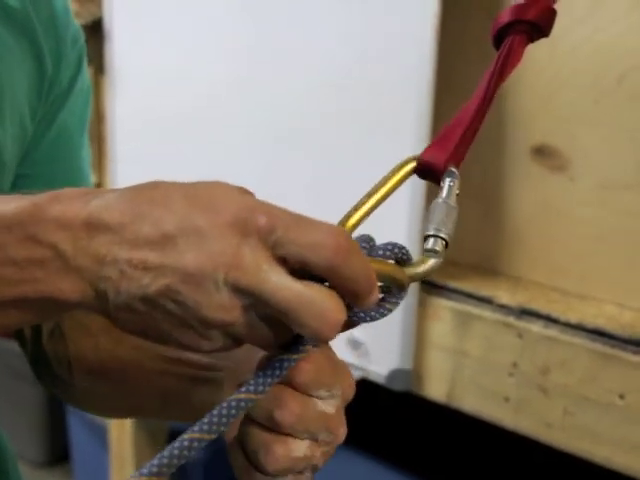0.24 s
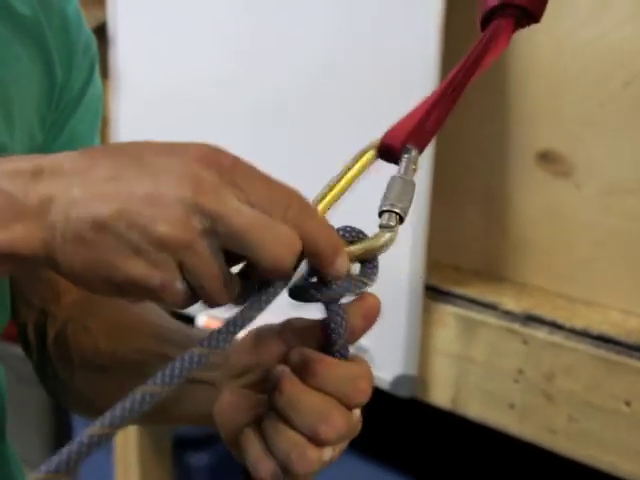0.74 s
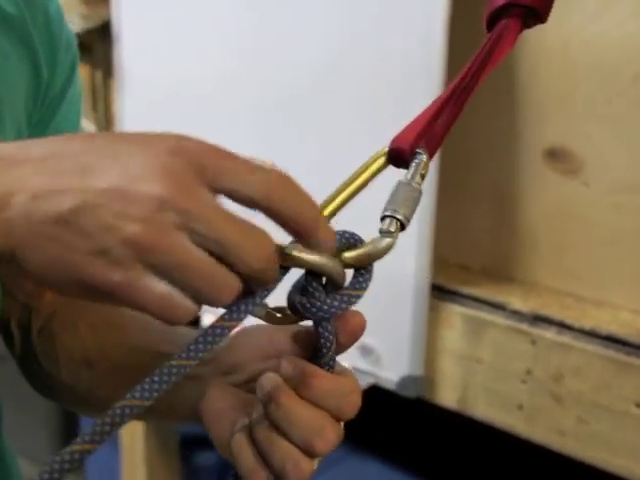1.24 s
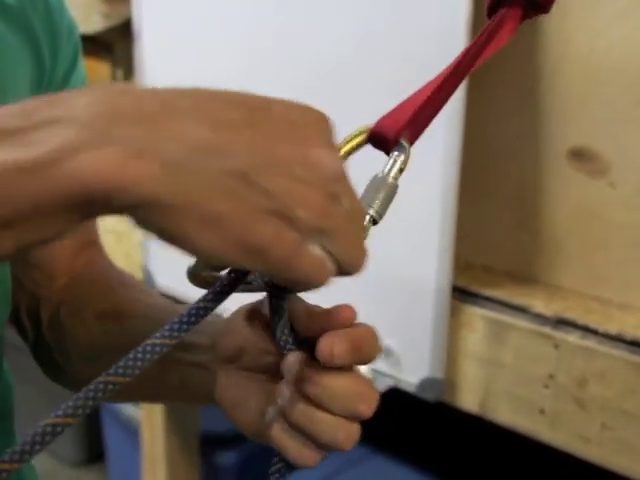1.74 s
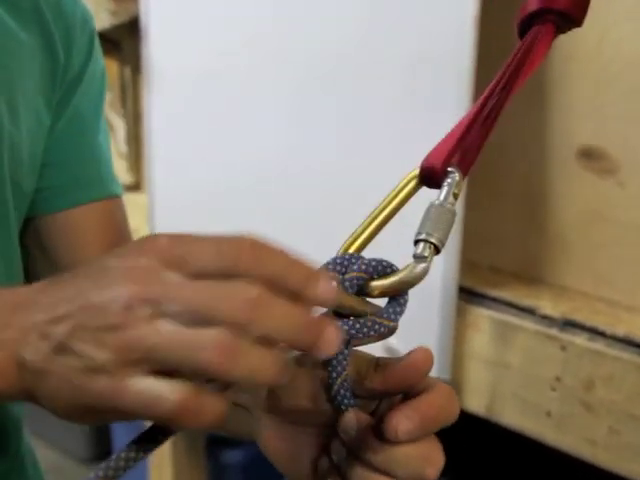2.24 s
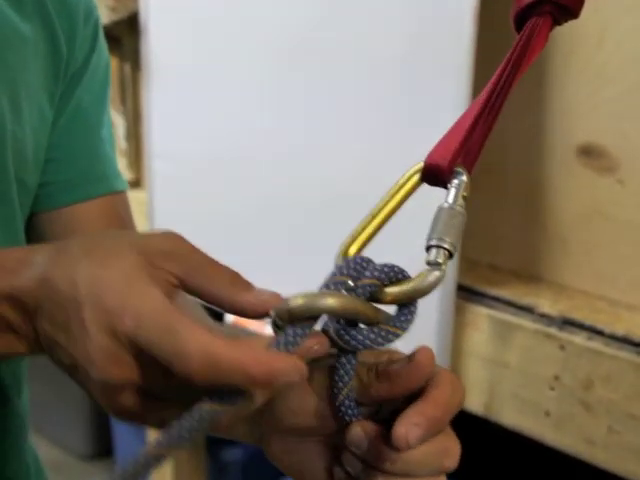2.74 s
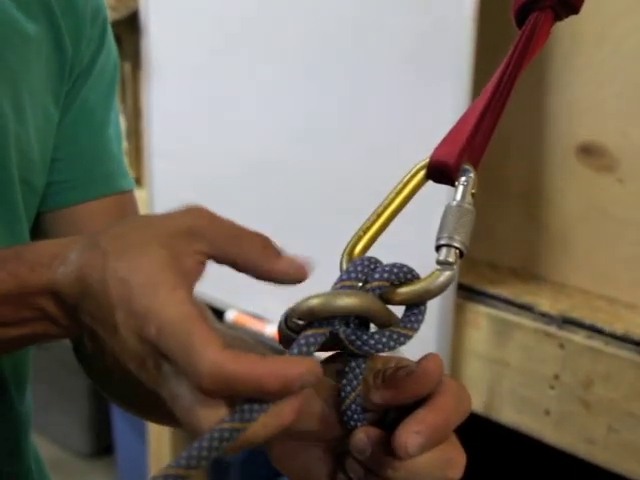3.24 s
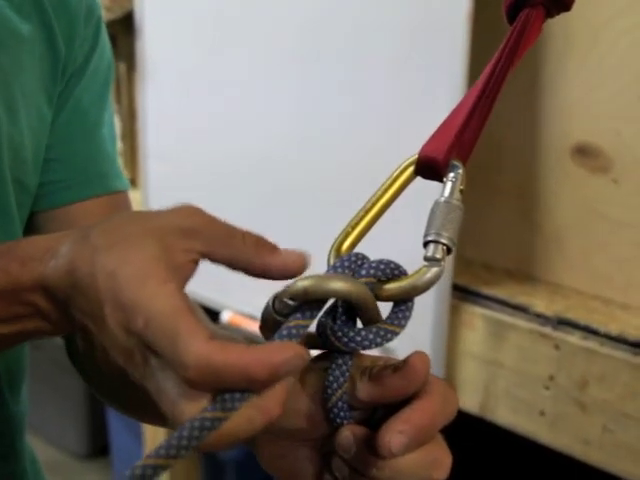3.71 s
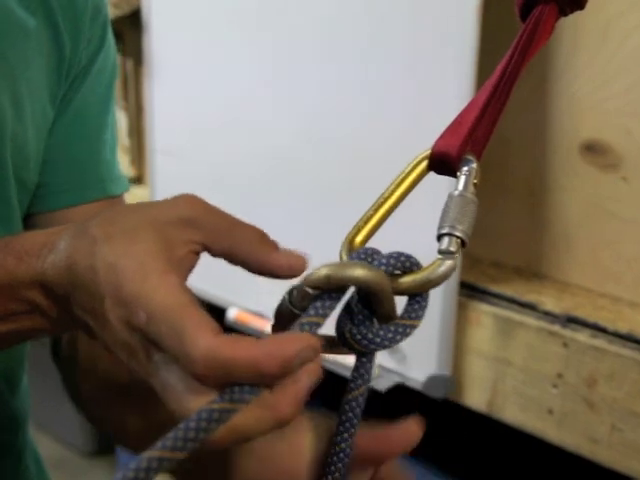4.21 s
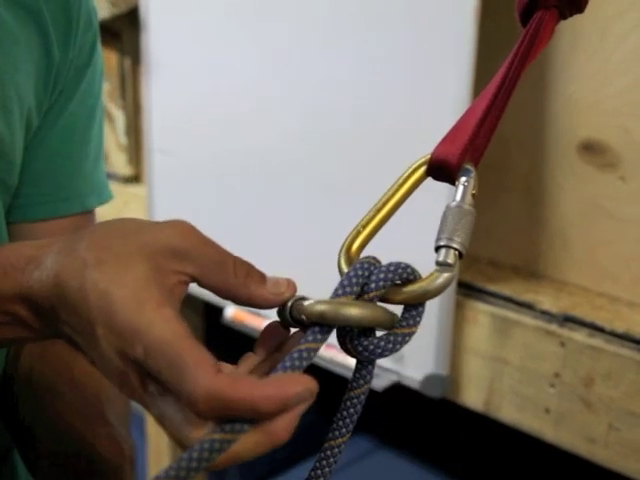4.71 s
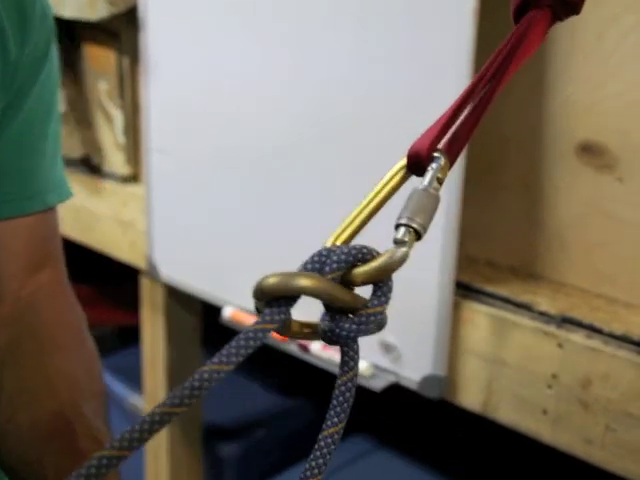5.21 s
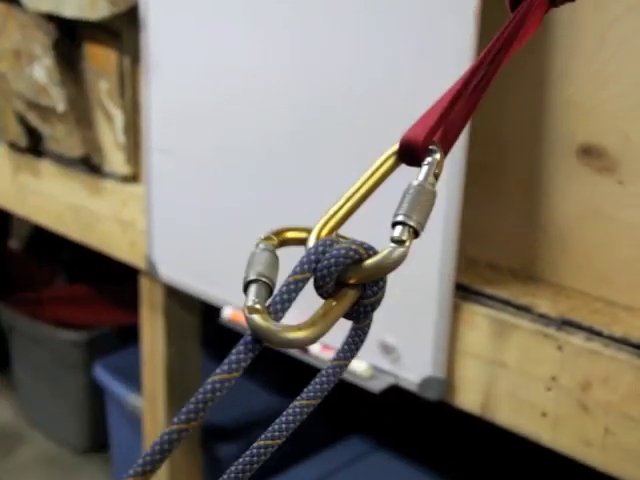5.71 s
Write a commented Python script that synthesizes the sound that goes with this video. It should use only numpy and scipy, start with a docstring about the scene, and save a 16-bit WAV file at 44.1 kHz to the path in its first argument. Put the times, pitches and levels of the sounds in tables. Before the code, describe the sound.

A close microphone in a small timber workshop picks up carabiners being worked on a rope, over a soft low wash of outside traffic with gliding engine drones and a very faint high whine that comes and goes. From 0.2 to 0.9 s there are light scrapes, small clinks and growing dull knocks. At 1.0 s a very loud, bright steel snap cracks out, briefly ducking the background. A clink follows at 1.3, a knock at 1.5, a rope rasp with a tiny squeak at 1.7, a firmer knock at 1.9 and a softer one at 2.2. Soft low bumps come around 2.4-2.6. From 2.75 to 4.1 s a loose screw sleeve ticks and scrapes in short turns, ending in a ringing clink. Dull taps and rope rubbing start at 4.9; at 5.6 s a second loud snap rings high, then rope rasps as traffic swells.

```python
"""A small workshop, where hands work a rope into two steel carabiners hung from a sling.
Struck steel rings in modes (knocks, clinks, sleeve ticks); stick-slip friction makes scrapes, squeaks and rope rasp.
Outside, traffic is shaped noise with gliding drones; a thin whine is a tone whose pitch and level arch.
The room adds reflections and a tail, and the loudest snaps make the recorder's limiter duck."""
import sys
import numpy as np
from scipy import signal
from scipy.fft import rfft, irfft
from scipy.io import wavfile
from scipy.ndimage import uniform_filter1d, minimum_filter1d

SR = 44100
rng = np.random.default_rng(int(sys.argv[2]) if len(sys.argv) > 2 else 0)


def unload_wav(signal):
    """Save mono or channel-first audio to the path in sys.argv[1] as 16-bit WAV at rate SR, clipped to [-1, 1]."""
    wavfile.write(
        sys.argv[1],
        SR,
        np.round(np.clip(np.atleast_2d(signal).T, -1, 1) * 32767).astype(np.int16),
    )


N = 262836
TIME = np.arange(N) / SR
EDGE_HZ = 16300  # upper band limit

# radiation colour of the loose screw sleeve, with narrow high resonances: f/Hz, level/dB
SLEEVE_COLOUR = [(200, -40), (1100, -19.5), (2200, -3), (2700, -3.5), (3300, 1), (4500, -2.5), (5600, -4),
                 (6700, -3), (7450, 4.5), (8600, -7), (9500, -3.5), (10200, -11.5), (10750, -7.5),
                 (11500, -16.5), (16000, -27.5)]
# turns of the sleeve, a tick as the thumb grips, then a scrape:
# t/s, length/s, tick level/dB, tick tilt/(dB/octave), scrape level/dB before the trim of all scrapes
TURNS = [(2.7583, 0.15, -31.5, 2, -40), (3.124, 0.05, -34.5, -2, -38.5), (3.4005, 0.044, -24, -1, -40),
         (3.628, 0.044, -38.5, -4, -34.5), (3.8541, 0.076, -25, 9.5, -34.5), (4.0885, .04, -31, -0.5, -35)]


def amp(db):
    """Level law: decibels to amplitude ratio."""
    return 10 ** (np.asarray(db) / 20)


def unit(x):
    """Energy normalisation: scales to rms 1."""
    return x / np.sqrt(np.mean(x ** 2) + 1e-20)


def read(points, hz):
    """Interpolates a spectrum on a logarithmic frequency axis."""
    f, value = np.transpose(points)
    return np.interp(np.log(hz + 1), np.log(f + 1), value)


def curve(rows):
    """Piecewise-linear envelope in time."""
    return np.interp(TIME, *np.transpose(rows))


def add(mix, s, sound):
    """Superposition: adds a sound into the mix at time s."""
    part = mix[max(round(s * SR), 0):][:len(sound)]
    part += sound[:len(part)]


def wander(rate_hz, size=N):
    """Random modulation: noise under a Gaussian low-pass, rms 1 over the full length."""
    hz = np.fft.rfftfreq(N, 1 / SR)
    spectrum = rfft(rng.standard_normal(N)) * np.exp(-(hz / rate_hz) ** 2)
    return unit(irfft(spectrum, N))[:size]


def colour(x, points, tilt=0, size=4096):
    """Minimum-phase filter: a causal response with the given spectrum, tilted in dB per octave about 4 kHz."""
    hz = abs(np.fft.fftfreq(size, 1 / SR))
    tilt_db = tilt * np.log2(np.clip(hz, 300, 13000) / 4000)
    log_gain = np.log(amp(read(points, hz) + tilt_db))
    # the Hilbert transform of the log gain gives the phase
    taps = np.fft.ifft(np.exp(np.conj(signal.hilbert(log_gain)))).real
    return signal.fftconvolve(x, taps[:size // 2])[:len(x)]


def resonate(x, hz, width_hz):
    """Resonance: two cascaded peaks act as a band of close modes around hz; rms 1."""
    b, a = signal.iirpeak(hz, hz / width_hz, fs=SR)
    once = signal.lfilter(b, a, x)
    return unit(signal.lfilter(b, a, once))


def steel(t):
    """Free vibration: a sum of damped modes of the steel bodies, weighted a little differently at each blow."""
    # modes of the steel bodies: f/Hz, level/dB (before the chance weighting), t60/s
    steel_modes = [(671, -10.5, 0.17), (1190, -7.5, 0.069), (1470, -7.5, 0.2), (1713, 7, 0.062),
                   (2210, 0, 0.052), (2984, -2.5, 0.18), (3400, -10.5, 0.051), (4140, -11, .1),
                   (4570, -14.5, 0.14), (4960, 0.5, .12), (6600, -14, 0.084), (6820, 9.5, 0.041),
                   (6660, -17.5, 0.067), (7300, -6, 0.21), (7740, 2.5, 0.086), (9260, -17, 0.081),
                   (10100, 4, 0.13)]
    ring = np.zeros(len(t))
    for hz, db, t60 in steel_modes:
        decay = amp(db + 2 * rng.standard_normal() - 60 * t / t60)
        ring += decay * np.sin(2 * np.pi * (hz * t + rng.random()))
    return ring


def blow(row, body, contact, modes_db, width_hz, soft_hz=10800, db_per_octave=26):
    """Impact excitation: a hard contact and dying chatter drive the body; the struck spot favours one band."""
    s, db, tilt, chatter, hz, favoured_db = row
    t = np.arange(SR // 3) / SR
    envelope = np.exp(-t / max(chatter, 1e-4)) + contact * np.exp(-t / 0.00073)
    force = rng.standard_normal(len(t)) * envelope
    sound = unit(colour(unit(force) + amp(modes_db) * unit(steel(t)), body, tilt))
    sound = sound + amp(favoured_db) * resonate(force, hz, width_hz)
    # a harder blow makes a shorter contact, which reaches higher
    top_hz = min(soft_hz * 2 ** (max(db + 29.5, 0) / db_per_octave), .45 * SR)
    sound = signal.lfilter(*signal.butter(4, top_hz, fs=SR), sound)
    return amp(db) * sound / sound[:SR // 100].std()  # level of the first 10 ms


def blows(rows, body, contact, modes_db, width_hz):
    """Superposition of all impacts of one kind."""
    out = np.zeros(N)
    for row in rows:
        add(out, row[0], blow(row, body, contact, modes_db, width_hz))
    return out


def slips(size, per_s, spread_db):
    """Stick-slip friction: a random train of tiny slips of uneven strength and either sign."""
    strength = amp(spread_db * np.minimum(rng.exponential(1, size), 4))
    return strength * rng.choice([-1, 1], size) * (rng.random(size) < per_s / SR)


def swells(rows, waver):
    """Frequency modulation: short unsteady tones under a raised-cosine envelope."""
    out = np.zeros(N)
    for s, length, hz, db in rows:
        size = int(max(length, .005) * SR)
        turns = np.cumsum(hz * (1 + waver * wander(460, size))) / SR
        add(out, s, amp(db) * unit(np.sin(2 * np.pi * turns) * np.hanning(size)))
    return out


def traffic():
    """Broadband and tonal sources: a low wash of shaped noise, with wavering, gliding engine drones."""
    # mean level of the wash: t/s, level/dB
    wash_level = [(0, -45), (.8, -41.5), (1.3, -44), (2.2, -44), (2.7, -46.5), (5.1, -43), (5.96, -36)]
    # colour of the wash: f/Hz, level/dB
    wash_colour = [(25, -33.5), (38, -16), (54, -1), (95, 2), (170, 0.5), (240, -2), (310, -9),
                   (520, -13.5), (950, -9.5), (1600, -10.5), (2200, -19.5), (4000, -25.5), (7200, -32),
                   (10500, -35.5), (16000, -40.5)]
    # evenly gliding drones: first f/Hz, last f/Hz, first level/dB, last level/dB (means, as both waver)
    drones = [(68.3, 40, -48, -61.5), (118.5, 104, -48, -53), (221.7, 218, -50, -51.5),
              (269.5, 308, -93.5, -43.5), (123.6, 170, -73, -45.5)]
    gain = amp(read(wash_colour, np.fft.rfftfreq(N, 1 / SR)))
    wash = irfft(rfft(rng.standard_normal(N)) * gain, N)
    out = amp(curve(wash_level) + .5 * wander(13)) * unit(wash)
    for hz0, hz1, db0, db1 in drones:
        turns = np.cumsum(np.linspace(hz0, hz1, N) + 0.72 * wander(3.5)) / SR
        level_db = np.linspace(db0, db1, N) + 2 * wander(2.5)
        out += amp(level_db) * np.sin(2 * np.pi * turns)
    return out


def whine(fuzz_hz=170):
    """Frequency modulation: a faint tone, fuzzed by random modulation, whose pitch and level arch together."""
    # arches of the whine: top t/s, rise/s, fall/s, top f/Hz, peak level/dB
    arches = [(.05, .16, 0.24, 6440, -56), (.34, .12, .06, 7600, -57), (2.229, 0.13, .26, 9400, -57),
              (2.58, 0.18, 0.14, 10070, -56.5), (4.81, 0.18, 0.16, 7500, -60.5)]
    sag, top_width = .17, 0.42  # share of pitch lost at the feet; width of the top as a share of rise or fall
    out = np.zeros(N)
    for s, rise, fall, top_hz, db in arches:
        from_top = np.clip((TIME - s) / np.where(TIME < s, rise, fall), -1, 1)
        hz = top_hz * (1 - sag * (1 - np.exp(-(from_top / top_width) ** 2)))
        turns = np.cumsum(hz + fuzz_hz * wander(895)) / SR
        out += amp(db) * (1 - from_top ** 2) * np.sin(2 * np.pi * turns)
    return out


def rope(uneven_db=1.0):
    """Friction noise: dense slips of the woven sheath on steel, in pulls that build, hold and die away."""
    # colour of the rasp: f/Hz, level/dB
    rasp_colour = [(400, -2.5), (1500, 4), (3000, 2.5), (5000, 3.5), (7200, 7.5), (9000, -2), (12000, -16),
                   (16000, -36.5)]
    # pulls through the hitch: t/s, length/s, level/dB (joined by power to the light rubbing)
    pulls = [(.77, 0.036, -44), (1.697, 0.087, -44.5), (2.464, .33, -59.5), (5.001, .13, -43.5),
             (5.23, 0.19, -49.5), (5.589, 0.11, -40), (5.867, .11, -37.5)]
    attack_s, release_s = 0.051, 0.049
    rasp = colour(slips(N, per_s=7600, spread_db=4), rasp_colour)
    level = amp(-61)  # between pulls the hands keep the rope rubbing lightly
    for s, length, db in pulls:
        before = np.maximum(s - TIME, 0) / attack_s
        after = np.maximum(TIME - s - length, 0) / release_s
        level = np.hypot(level, amp(db) * np.exp(-(before + after)))
    return level * amp(uneven_db * wander(40)) * unit(rasp)


def scrapes(favoured_db=-6, width_hz=900):
    """Stick-slip excitation: steel drags over steel in tiny slips; a duller scrape favours lower modes."""
    # carabiners scrape on each other: t/s, length/s, level/dB before the trim below, tilt/(dB/octave)
    drags = [(0.183, 0.047, -48, 0), (0.536, 0.037, -39.5, -2), (0.601, 0.047, -44.5, -0.5),
             (0.766, 0.044, -36.5, -11.5), (0.835, 0.052, -38.5, -14.5), (1.594, 0.026, -41, -6.5),
             (1.655, .026, -43, -1.5), (2.049, 0.081, -45, -3), (5.55, 0.033, -40.5, -7.5)]
    grip_s, turn_tilt = .013, -1.5  # delay of the scrape after the grip, its tilt in dB per octave
    neutral_hz, db_per_octave = 5530, 6  # favoured pitch at no tilt; so much less tilt lowers it an octave
    out = np.zeros(N)
    turning = [(s + grip_s, length, db, turn_tilt) for s, length, _, _, db in TURNS]
    for s, length, db, tilt in drags + turning:
        hz = min(neutral_hz * 2 ** (tilt / db_per_octave), EDGE_HZ)
        size = int(max(length, .005) * SR)
        force = slips(size, per_s=1000, spread_db=5) * signal.windows.tukey(size, .4)
        force = np.pad(force, (0, 256))  # room for the ringing to die
        grains = unit(colour(force, SLEEVE_COLOUR, tilt))
        grains = grains + amp(favoured_db) * resonate(force, hz, width_hz)
        add(out, s, amp(db) * unit(grains))
    return amp(-3.0) * out  # trim of all scrapes


def clinks():
    """Impact of metal: bright clinks and snaps, the bright onsets of some knocks, and a few duller thumps."""
    # blows: t/s, level/dB, tilt/(dB/octave), chatter decay/s, favoured f/Hz, its level/dB
    clink_rows = [(.2135, -43.5, -7, .002, 3420, -15), (.4172, -28, -0.5, 0.00069, 7020, -4),
                  (.558, -35.5, -6, 0.00066, 5600, -7), (.678, -25.5, -4.5, 0.0013, 6700, 2),
                  (.9286, -18.5, -3.5, 0.00043, 6770, 16), (1.0048, -4, 2.5, 0.0053, 5150, -4.5),
                  (1.009, 1.5, 2.5, 0.0013, 6170, -11), (1.0118, -10, 0, .001, 3620, -1.5),
                  (1.2766, -16.5, 0.5, 0.001, 6980, 1.5), (1.4442, -30.5, -3, .012, 7270, -1),
                  (2.2292, -31, -6.5, .0023, 6700, -5), (4.132, -19, 3.5, 0.0068, 7200, -13),
                  (4.1338, -20.5, 11.5, 0.0016, 4690, 0.5), (4.918, -32, -10, 0.0025, 1770, 14),
                  (4.9228, -35, -7.5, 0.0016, 3360, 5), (4.9352, -33.5, -5.5, 0.001, 4570, -8),
                  (5.5928, -3.5, 2.5, 0.002, 5790, -7.5), (5.833, -35.5, -10, 0.0056, 1980, 4)]
    # colour before the tilt: f/Hz, level/dB
    clink_colour = [(100, -44.5), (400, -12), (1000, -27.5), (2100, -0.5), (2700, -5), (3400, 0.5),
                    (5000, 0.5), (6300, 2), (7400, 3.5), (9000, -4), (10700, -9.5), (11800, -13),
                    (16000, -23.5)]
    return blows(clink_rows, clink_colour, contact=0.23, modes_db=-20.5, width_hz=660)


def knocks():
    """Impact under load: dull knocks of the loaded carabiners."""
    # knocks: t/s, level/dB, tilt/(dB/octave), chatter decay/s, favoured f/Hz, its level/dB
    knock_rows = [(.3218, -36, -5, 0.0064, 1610, -11), (.379, -30, 0.5, 0.0092, 4770, -22),
                  (.678, -19.5, -1, .014, 1160, -18), (.9288, -17, 0, 0.0045, 3270, -14),
                  (.9355, -23.5, -1, .007, 4550, -3.5), (1.5245, -24.5, 0.5, 0.0077, 2174, -3.5),
                  (1.8215, -30.5, -1, 0.011, 3450, -7), (1.8668, -17.5, -0.5, 0.0043, 5160, -6),
                  (2.2292, -25.5, -2, 0.011, 1105, -19), (5.479, -38, 0, 0.0056, 1380, 3)]
    # colour before the tilt: f/Hz, level/dB
    knock_colour = [(150, -13.5), (370, 0.5), (520, -9.5), (680, 5.5), (1200, 3), (1750, 8), (2800, 1),
                    (3500, 2.5), (4900, 1), (6000, -4), (7000, -17), (8600, -16.5), (10300, -26),
                    (14000, -42.5)]
    return blows(knock_rows, knock_colour, contact=0.22, modes_db=-16.0, width_hz=210)


def singing():
    """Free decay: single lightly damped modes sing on after some of the blows."""
    # singing modes: t/s, f/Hz, initial level/dB, t60/s
    sung_modes = [(.678, 9200, -55, 0.23), (.9286, 9290, -47, 0.25), (4.133, 4470, -37, 0.22),
                  (5.593, 9800, -18, .26)]
    out = np.zeros(N)
    t = np.arange(SR // 2) / SR
    for s, hz, db, t60 in sung_modes:
        add(out, s, amp(db - 60 * t / t60) * np.sin(2 * np.pi * hz * t))
    return out


def squeaks():
    """Periodic stick-slip: brief squeaks as wavering tones."""
    # squeaks: t/s, length/s, mean f/Hz, level/dB
    squeak_rows = [(1.702, 0.027, 4405, -33), (1.722, 0.078, 4560, -48), (2.828, 0.022, 1680, -44),
                   (4.114, .014, 7460, -41), (5.56, 0.031, 7180, -42)]
    return swells(squeak_rows, waver=0.012)


def bumps():
    """Low-frequency motion: soft bumps of the hands on the taut rope as wavering tones."""
    # bumps: t/s, length/s, mean f/Hz, level/dB
    bump_rows = [(2.41, 0.047, 87, -45), (2.58, 0.093, 83.4, -41.5)]
    return swells(bump_rows, waver=.05)


def sleeve_ticks():
    """Impact at a shifting spot: the sleeve ticks as each turn starts and as it rattles on its thread."""
    # rattles: t/s, level/dB, tilt/(dB/octave), chatter decay/s
    rattles = [(2.8393, -35, -4.5, 0.0067), (2.92, -34.5, -1, 0.0074), (2.9312, -20, 2, 0.0029),
               (2.941, -24.5, 3, .005), (3.1783, -34.5, -3.5, 0.0033), (3.2027, -36, 0, 0.0024),
               (3.4232, -29.5, -2, 0.0097), (3.4627, -25.5, 4.5, .0013), (3.4811, -34.5, -1, 0.0019),
               (3.863, -33.5, -5, 0.0047)]
    grip_chatter_s = 0.0035
    favoured_hz, scatter, favoured_db = 7300, 0.085, -9  # scatter is relative, from tick to tick
    grips = [(s, db, tilt, grip_chatter_s) for s, _, db, tilt, _ in TURNS]
    rows = []
    for tick in grips + rattles:
        hz = favoured_hz * (1 + scatter * rng.uniform(-1.3, 1))
        rows.append((*tick, hz, favoured_db))
    return blows(rows, SLEEVE_COLOUR, contact=0.18, modes_db=-29, width_hz=1700)


def sleeve_ring(x, ring_db=-12.5):
    """Modal response by convolution: every tick and slip sets the sleeve and gate ringing."""
    # modes of sleeve and gate: f/Hz, relative level/dB, t60/s
    sleeve_modes = [(3065, -6, 0.15), (3370, -5.5, 0.095), (3870, -11, 0.082), (4658, -10, 0.22),
                    (7100, -10, 0.065), (7450, -2, 0.063), (8050, -8, 0.069), (9350, -3.5, 0.081),
                    (10620, 2.5, 0.076)]
    t = np.arange(SR // 6) / SR
    ring = sum(amp(db - 60 * t / t60) * np.sin(2 * np.pi * hz * t) for hz, db, t60 in sleeve_modes)
    return x + amp(ring_db) * signal.fftconvolve(x, ring / np.linalg.norm(ring))[:N]


def room(x, early_db, tail_db):
    """Reverberation: quick reflections off board and timber close by, then a tail whose treble dies first."""
    # reverberation time: f/Hz, t60/s
    room_decay = [(300, 0.74), (1300, 0.46), (3500, 0.36), (7000, 0.3), (10000, 0.26), (15000, 0.23)]
    t = np.arange(SR // 2) / SR
    sparse = rng.standard_normal(len(t)) * (rng.random(len(t)) < .06)
    early = sparse * (t > .002) * np.exp(-t / 0.0064)
    hz, at, z = signal.stft(rng.standard_normal(len(t)), SR, nperseg=256)
    decay = amp(-60 * at / read(room_decay, hz)[:, None])
    tail = signal.istft(z * decay, SR, nperseg=256)[1][:len(t)]
    tail *= np.clip((t - .004) / 0.0053, 0, 1)  # the tail builds up after 4 ms
    echoes = amp(early_db) * early / np.linalg.norm(early)
    echoes = echoes + amp(tail_db) * tail / np.linalg.norm(tail)
    return signal.fftconvolve(x, echoes)[:N]


def scene():
    """Direct and reverberant fields: knocks shake the timber and fill the room; the rest of the metal is drier."""
    knocking = knocks()
    # three random draws of the clinks: the first is heard direct, all feed the room for a smoother tail
    draws = [clinks() for _ in range(3)]
    rubbing = sleeve_ring(sleeve_ticks() + scrapes()) + rope() + squeaks()
    echoes = room(knocking, early_db=-7.5, tail_db=-4.0)
    echoes += room(rubbing, early_db=-6.5, tail_db=-8.5)
    echoes += sum(room(draw, early_db=-10.5, tail_db=-14.5) for draw in draws)
    direct = knocking + draws[0] + rubbing + singing()
    return (direct + echoes + bumps() + traffic() + whine())[None]


def record(dry, threshold_db=-9, recovery_db_per_s=15, hold_s=0.15):
    """Dynamic limiting: fast gain reduction, hold and slow recovery; the last peaks clip; then the band limit."""
    power = abs(uniform_filter1d(dry[0] ** 2, size=66))  # 1.5 ms mean
    over_db = np.maximum(10 * np.log10(power + 1e-12) - threshold_db, 0)
    half = int(hold_s * SR / 2)
    # the greatest excess within the past hold time
    held = -minimum_filter1d(-over_db, 2 * half + 1, origin=half, mode="constant")
    fall = recovery_db_per_s * TIME
    released = np.maximum.accumulate(held + fall) - fall
    duck_db = signal.lfilter([1 / 30], [1, -29 / 30], released)  # attack within a millisecond
    clipped = np.clip(dry * amp(-duck_db), -1, 1)
    low_pass = signal.firwin(255, EDGE_HZ, window=("kaiser", 8), fs=SR)
    return signal.oaconvolve(clipped, low_pass[None], "same")


dry = scene()
out = record(dry)
unload_wav(out)
```